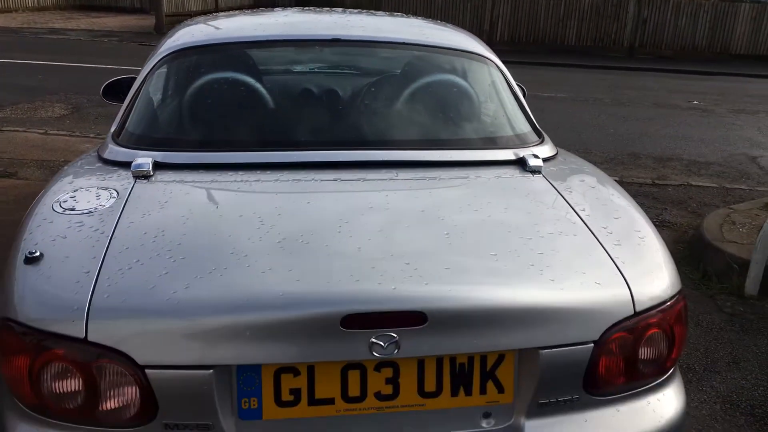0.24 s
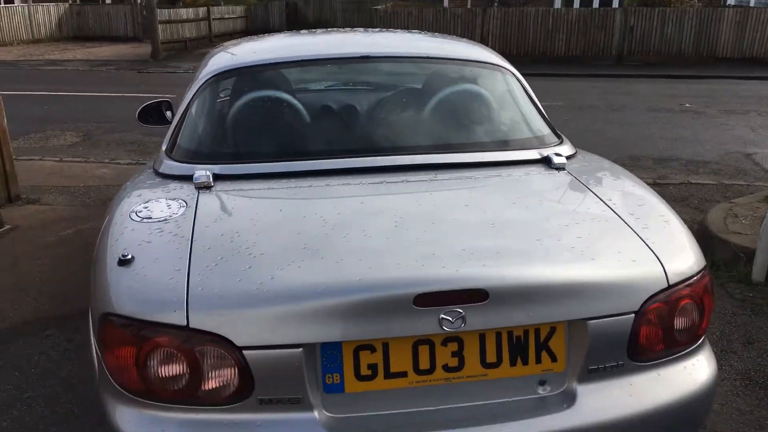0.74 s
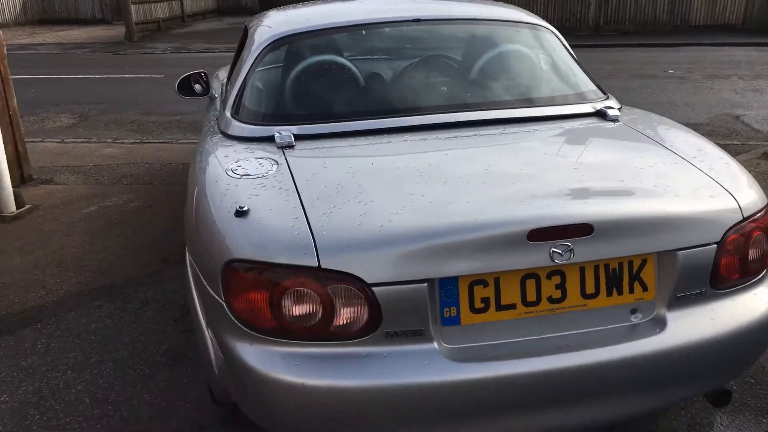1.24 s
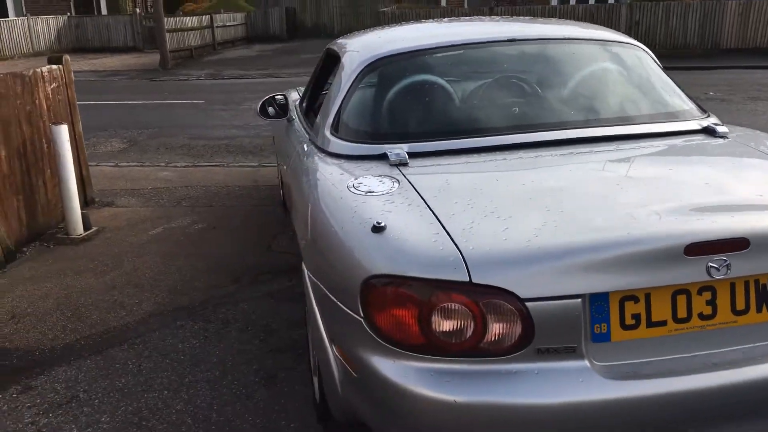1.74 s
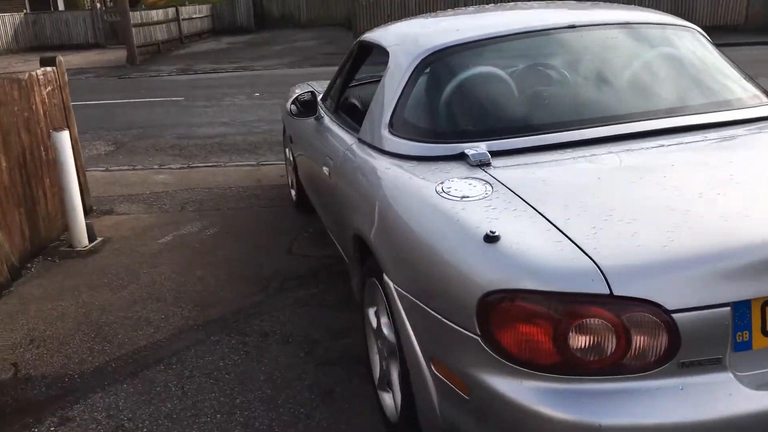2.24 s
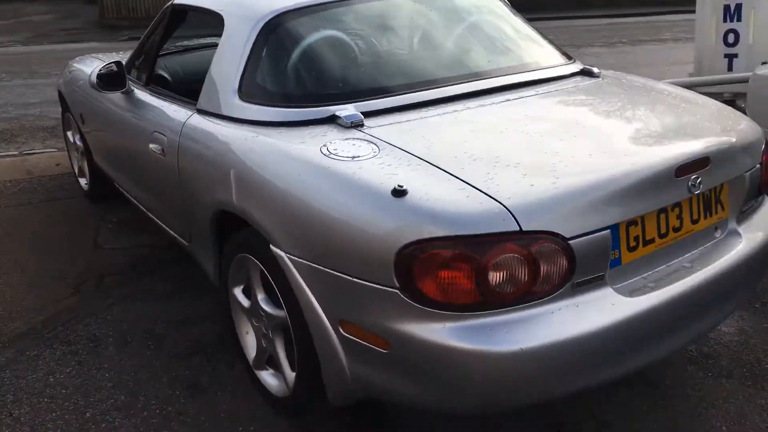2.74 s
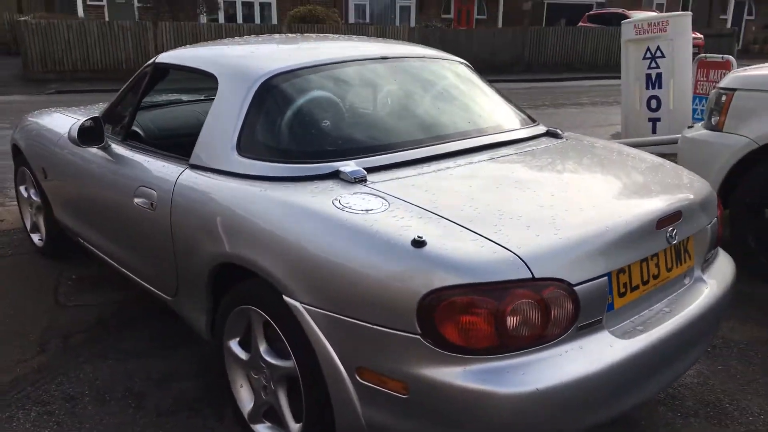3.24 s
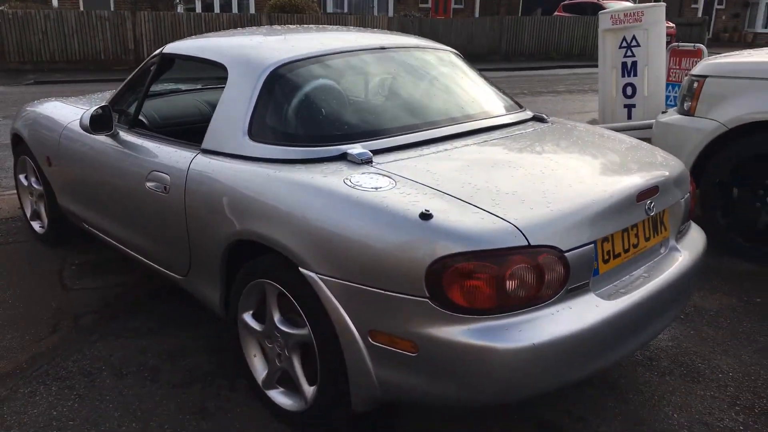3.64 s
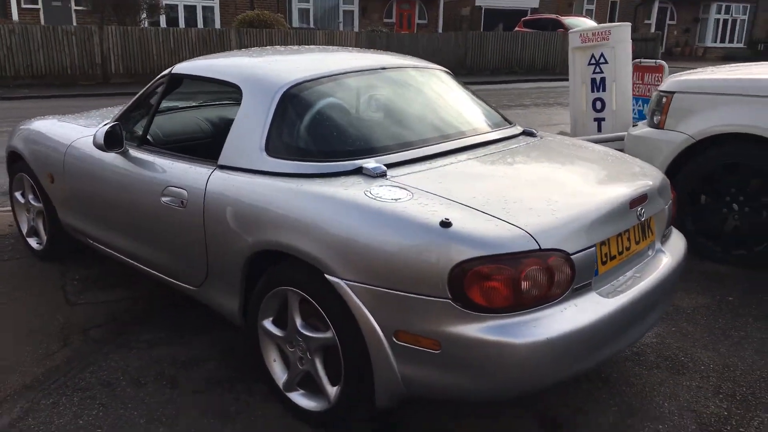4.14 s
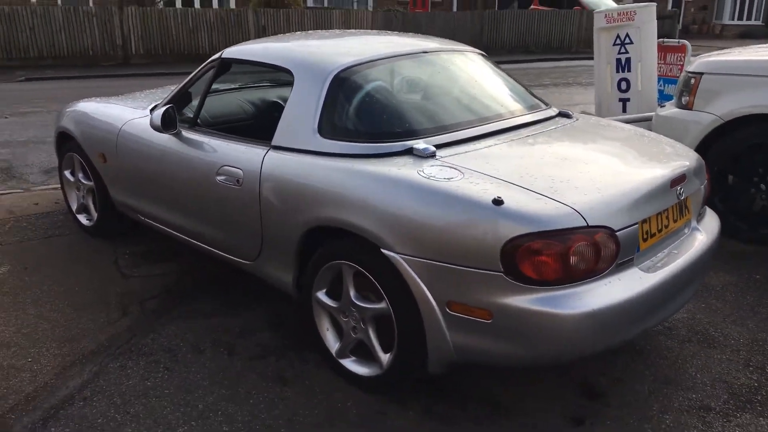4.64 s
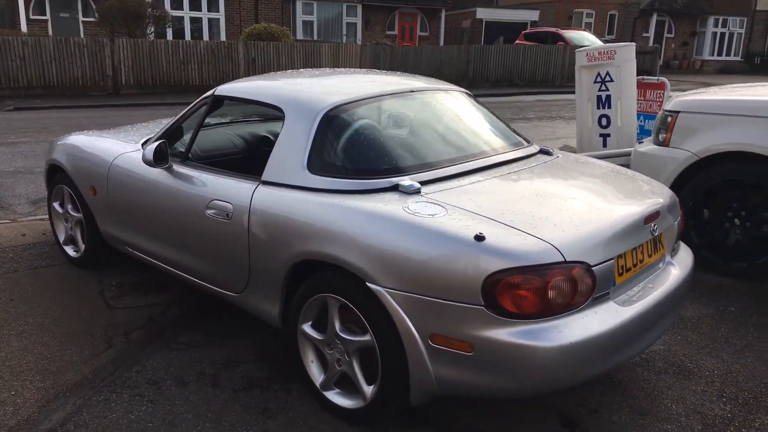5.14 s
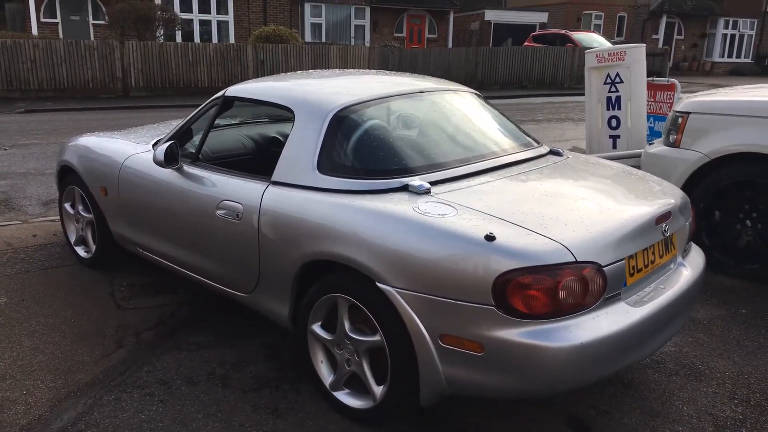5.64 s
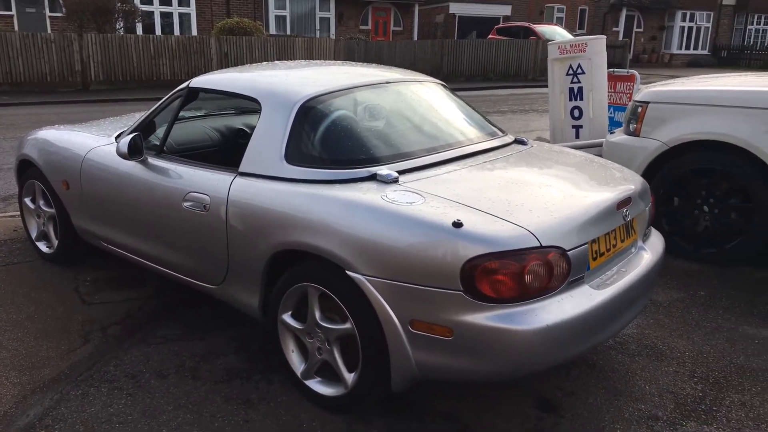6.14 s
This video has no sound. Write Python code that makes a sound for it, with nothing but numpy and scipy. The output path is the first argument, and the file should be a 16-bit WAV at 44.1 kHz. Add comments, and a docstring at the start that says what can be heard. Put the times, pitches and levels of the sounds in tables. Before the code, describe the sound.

Low, ragged wind buffeting thumps a small outdoor microphone over faint traffic roar, with tiny grit ticks and a rattle, then a sudden loud jump.

```python
"""A forecourt beside a road: someone walks round a parked car, holding a small microphone in a breeze.
Gusts buffet it with low rumble, flutter and pulse-like slaps; shaped noise makes the far traffic's roar.
Grit and a loose rattle are filtered random clicks, keys are decaying sines, small birds gliding whistles.
Near the end the level of the whole scene jumps up abruptly at a volume step, written into the level
curves and a swap of background noise, and one hard gust overloads the input."""
import sys
import numpy as np
from scipy import signal
from scipy.fft import rfft, irfft, next_fast_len
from scipy.io import wavfile
from scipy.ndimage import uniform_filter1d

SR = 44100
rng = np.random.default_rng(int(sys.argv[2]) if len(sys.argv) > 2 else 0)


def int16_out(signal):
    """Quantize to a 16-bit WAV file."""
    q = np.round(np.clip(np.atleast_2d(signal).T, -1, 1) * 32767)
    wavfile.write(sys.argv[1], SR, q.astype(np.int16))


def gain_from_db(level_db):
    """Turn a decibel level (scalar or array-like) into a linear amplitude factor."""
    decades = np.asarray(level_db, float) / 20
    return 10 ** decades


N = 281358  # length in samples


def rms_one(x):
    """Scale to rms 1."""
    return x / np.sqrt(np.mean(x ** 2) + 1e-20)


def in_time(rows):
    """Curves with one value per sample, one for each column after the time."""
    s, *columns = np.transpose(rows)
    return [np.interp(np.arange(N) / SR, s, column) for column in columns]


def drift(rate_hz):
    """Slow random wander of rms 1: noise through two equal poles, made at every 40th sample."""
    pole = np.exp(-2 * np.pi * rate_hz * 40 / SR)
    noise = rng.standard_normal(N // 40 + 2002)
    slow = signal.lfilter([1], [1, -2 * pole, pole * pole], noise)[2000:]  # drop the settling
    return np.interp(np.arange(N) / 40, np.arange(len(slow)), rms_one(slow))


def coloured(spectrum):
    """Noise of rms 1 shaped to a spectrum, falling 30 dB per octave beyond its ends."""
    hz, db = np.transpose(spectrum)
    size = next_fast_len(N)
    bins = np.maximum(np.fft.rfftfreq(size, 1 / SR), 1)
    skirt_db = -30 * np.log2(np.maximum(hz[0] / bins, 1) * np.maximum(bins / hz[-1], 1))
    shape = gain_from_db(np.interp(np.log(bins), np.log(hz), db) + skirt_db)
    return rms_one(irfft(rfft(rng.standard_normal(size)) * shape, size)[:N])


def band_rms(x, low_hz, high_hz):
    """Rms of one band."""
    sos = signal.butter(4, [low_hz, high_hz], "band", fs=SR, output="sos")
    return np.std(signal.sosfilt(sos, x))


def add(out, s, piece):
    """Mix a short sound in at s seconds."""
    at = round(s * SR)
    out[at:at + len(piece)] += piece[:N - at]


def steady(x, over_s):
    """Even out the slow swells of narrow noise."""
    return x / np.sqrt(uniform_filter1d(x ** 2, size=round(over_s * SR)) + 0.14)


def peak(x, hz, width_hz):
    """A resonance of gain 1 on top."""
    return signal.lfilter(*signal.iirpeak(hz, hz / width_hz, SR), x)


def background():
    """Far tyre roar over microphone noise; at a volume step it jumps up in level and changes colour."""
    # before the step: start_s, roar_db (830-2500 Hz band), hiss_db (microphone hiss near 5.4 kHz)
    traffic = [(0, -60, -82.5), (.9, -62, -83.5), (1.6, -63.5, -88.5), (2.4, -65.5, -90.5),
               (4.3, -66, -90.5), (5.5, -63.5, -99)]
    # colour of roar and self-noise before the step: frequency_hz, density_db (per Hz)
    quiet_spectrum = [(200, -7), (350, -5), (490, -10), (900, -1), (1750, 0), (2200, -8), (2850, -19.5),
                      (4000, -27.5), (7000, -31), (9600, -31.5), (11000, -35), (13900, -36), (14800, -52)]
    # colour of the background after the step: frequency_hz, density_db (per Hz)
    loud_spectrum = [(200, -4), (330, -3), (500, -9), (720, -4), (1060, 0), (1610, -3), (2250, -12),
                     (3100, -20), (4600, -24.5), (5100, -30), (6100, -33.5), (7600, -41), (10000, -47),
                     (15600, -49)]
    step_s, step_rise_s, loud_db = 5.533, 0.0062, -46

    roar_db, hiss_db = in_time(traffic)
    quiet, loud = coloured(quiet_spectrum), coloured(loud_spectrum)
    quiet = quiet / band_rms(quiet, 830, 2500)
    # the microphone's faint self-noise keeps its level while the roar changes
    roar = signal.filtfilt(*signal.butter(2, 5100, fs=SR), quiet)
    self_noise = gain_from_db(roar_db.mean()) * (quiet - roar)
    swell_db = 0.76 * drift(14) + 0.4 * drift(4.1)
    microphone_hiss = gain_from_db(hiss_db) * coloured([(5000, -6.0), (5420, -2.0), (6300, -13.0)])
    quiet = self_noise + gain_from_db(roar_db + swell_db) * roar + microphone_hiss

    loud = gain_from_db(loud_db + 1.0 * drift(13.4)) * loud / band_rms(loud, 1050, 2500)
    up = np.clip((np.arange(N) / SR - step_s) / step_rise_s, 0, 1)
    return quiet * (1 - up) + loud * up


def birds():
    """Gliding whistles; breathy ones are smeared by a fast random flutter of their strength."""
    # bird notes: start_s, length_s, two or more pitch_hz passed at even steps (or one held),
    # level_db, breathiness (0-1)
    notes = [(4.508, .037, 4550, 4400, -86, .6), (5.785, .047, 6200, 5950, 5950, -69.5, .65),
             (5.893, .024, 4590, 4620, -68, .2), (5.955, .06, 7400, 7200, 6750, -76, .15),
             (6.113, .064, 8050, 7650, 7250, 7150, 6700, -70.5, .25),
             (6.116, .04, 5550, 6250, 6050, -71, .55), (6.14, .03, 4230, 4640, 4670, -62, .4),
             (6.154, .032, 4250, 3950, -58.5, .8), (6.17, .075, 3200, -59.5, .85)]
    out, flutter = np.zeros(N), drift(260)
    for start, length, *glide_hz, db, breath in notes:
        u = np.linspace(0, 1, round(length * SR))
        pitch_hz = np.interp(u * (len(glide_hz) - 1), np.arange(len(glide_hz)), glide_hz)
        strength = np.sqrt(1 - breath ** 2) + breath * flutter[round(start * SR):][:len(u)]
        envelope = np.sqrt(2 * np.sin(np.pi * u))
        whistle = np.sin(2 * np.pi * np.cumsum(pitch_hz) / SR)
        add(out, start, gain_from_db(db) * strength * envelope * whistle)
    return out


def keys():
    """Keys touching in a pocket: thin metal modes, struck softly."""
    # touches: start_s, then level_db of each mode in turn
    touches = [(2.042, -71.5, -73, -87), (2.164, -74.5, -105, -88.5), (2.313, -96, -73, -73),
               (2.855, -74, -86, -68)]
    # modes of the metal: pitch_hz, t60_s (time to fall 60 dB)
    modes = [(5960, .08), (8310, .08), (15010, .075)]
    out, t = np.zeros(N), np.arange(round(.15 * SR)) / SR
    soft_start = 1 - np.exp(-t / .002)
    for s, *levels_db in touches:
        for (hz, t60), db in zip(modes, levels_db):
            add(out, s, gain_from_db(db - 60 * t / t60) * soft_start * np.sin(2 * np.pi * hz * t))
    return out


def rattles():
    """A small loose object: each shake is a dense run of touches dying away, ringing in the same modes."""
    # shakes: start_s, peak_db, dying_s (time constant)
    shakes = [(3.974, -61, 0.0086), (3.989, -49, 0.013), (4.012, -54, 0.003), (4.085, -69, 0.022),
              (4.646, -52.5, .004)]
    # modes of the object: pitch_hz, width_hz, level_db
    modes = [(1710, 420, 8.5), (3700, 1400, -8), (5240, 440, 1.5), (6370, 400, -6), (8450, 400, -6)]
    out, t = np.zeros(N), np.arange(4096) / SR
    chance = rng.standard_normal((len(shakes), 2, 4096))
    for (s, db, dying), (size, when) in zip(shakes, chance):
        touches = size * (when > 1.2) * np.exp(-t / dying) * (1 - np.exp(-t / .001))
        shake = gain_from_db(-18) * touches  # broad part of each touch
        for hz, width, mode_db in modes:
            shake = shake + gain_from_db(mode_db) * peak(peak(touches, hz, width), hz, 2 * width)
        add(out, s, gain_from_db(db) * shake / np.max(np.abs(shake)))
    return out


def crackles():
    """Finer grit as the feet shuffle: rows like those of the grit, at chance moments and pitches."""
    from_s, to_s, per_s, peak_db, spread_db = 2.5, 3.4, 11, -65, 6
    when, size, pitch = rng.random((60, 3)).T
    s = from_s + np.cumsum(-np.log(1 - when)) / per_s
    db = peak_db + spread_db * (2 * size - 1)
    centre_hz = 1800 * 6.5 ** pitch
    rows = np.transpose([s, db, centre_hz, np.full(len(s), .0015)])
    return list(rows[s < to_s])


def grit():
    """A few grains crack at once: sparse clicks dying away, broad in colour with two short rings."""
    # grit under a shoe: start_s, peak_db, centre_hz, dying_s (time constant)
    crunches = [(1.988, -53.5, 5470, 0.0011), (2.648, -63, 13000, 0.0018), (2.71, -46, 1390, 0.001),
                (2.726, -64.5, 4500, .008), (2.742, -53, 1900, 0.00056), (2.937, -58.5, 10100, 0.0033),
                (3.009, -62.5, 9500, .004), (3.289, -64, 8500, 0.0065), (3.365, -60.5, 2620, 0.0085),
                (4.485, -60, 10500, 0.006), (4.612, -61, 5960, 0.036)]
    # resonances that every crack excites: pitch_hz, width_hz, level_db
    grit_rings = [(5340, 300, 2), (8650, 230, 4)]
    out, chance = np.zeros(N), rng.standard_normal((80, 2, 2048))
    t = np.arange(2048) / SR
    for (s, db, hz, dying), (size, when) in zip(crunches + crackles(), chance):
        cracks = size * ((when > 1.6) | (t == 0)) * np.exp(-t / max(dying, .0003))
        sos = signal.butter(2, [hz / 1.6, min(hz * 1.6, .45 * SR)], "band", fs=SR, output="sos")
        tick = signal.sosfilt(sos, cracks)
        tick = tick + sum(gain_from_db(ring_db) * peak(tick, ring_hz, width) for ring_hz, width, ring_db in grit_rings)
        add(out, s, gain_from_db(db) * tick / np.max(np.abs(tick)))
    return out


def wind_db():
    """Rumble level: every gust climbs and dies evenly in dB over the breeze; flutter rides on it."""
    # steady breeze between the gusts: start_s, rumble_db
    breeze = [(0, -60), (.45, -57.5), (.7, -60.5), (1.08, -58.5), (1.5, -49.5), (1.9, -64), (2.33, -67),
              (2.42, -51), (3.3, -51), (3.55, -59), (3.9, -63.5), (4.1, -55.5), (4.3, -67.5), (5.0, -66),
              (5.27, -67.5), (5.31, -52), (5.52, -54.5), (5.7, -43.5), (6.38, -43)]
    # gusts that buffet the microphone: peak_s, peak_db, fall_s (to die by 20 dB; under 0.01 acts as 0.01)
    gusts = [(1.109, -50.5, -0.1), (1.23, -28.5, 0.18), (1.342, -36, 0.16), (1.581, -39.5, 0.05),
             (1.804, -40.5, 0.05), (1.961, -49.5, 0.2), (2.082, -37.5, 0.17), (2.21, -34.5, 0.03),
             (2.379, -42.5, 0.06), (2.48, -44, 0.3), (2.6, -43, 0.25), (2.649, -43, 0.36), (2.8, -48, 1),
             (2.967, -29.5, 0.08), (3.177, -45, 0.33), (3.288, -41.5, 0.05), (3.476, -46, -0.03),
             (3.617, -51, 0.05), (3.696, -36, 0.0851), (3.836, -53, 0.2), (4.145, -50, 0.15),
             (5.158, -57, 0.07), (5.471, -42, 0.3), (5.567, -35, 0.16), (5.636, -19.5, 0.0148),
             (5.676, -23, 0.02), (5.766, -25.5, 0.04), (5.83, -35, 0.06), (5.946, -37, -0.1),
             (6.046, -39.5, 0.5), (6.376, -35.5, 0.151)]
    # how ragged the wind is: start_s, flutter_db (relative to the rumble)
    ragged = [(0, -8), (1.1, -12), (2.4, -7), (4.3, -15), (5.65, -13), (5.75, -22.5), (6.38, -22)]
    gust_rise_s = 0.053  # every gust climbs its last 20 dB in this time
    t, power = np.arange(N) / SR, gain_from_db(in_time(breeze)[0]) ** 2
    for s, db, dying_s in gusts:
        lengths = np.where(t > s, (t - s) / max(dying_s, .01), (s - t) / gust_rise_s)
        power = power + gain_from_db(db - 20 * lengths) ** 2
    rumble_db = uniform_filter1d(10 * np.log10(power), size=round(.008 * SR))
    return rumble_db, rumble_db + in_time(ragged)[0]


def small_slaps():
    """Lesser slaps at chance moments, following the flutter: rows of start_s, peak_db, strongest_hz."""
    per_s, over_flutter_db, spread_db, low_hz, high_hz = 18, 15.5, 3, 97.1, 210.2
    when, size, pitch = rng.random((120, 3)).T
    s = np.cumsum(-np.log(1 - when)) / per_s + .05
    flutter_db = np.interp(s * SR, np.arange(N), wind_db()[1])
    db = flutter_db + over_flutter_db + spread_db * (2 * size - 1)
    rows = np.transpose([s, db, low_hz * (high_hz / low_hz) ** pitch])
    return list(rows[s < N / SR])


def push_pull(t, hz, turn):
    """A sharp-cornered pulse, strongest at hz, its spectrum falling about evenly in dB per Hz above."""
    sharp = 3.15
    return np.exp(2j * np.pi * turn) / (1 - 2j * np.pi * hz * t / (sharp - 1)) ** sharp


def slaps():
    """Each eddy at the port is a sharp push and pull; a ragged wake of three lesser, lower ones follows."""
    # hardest eddies that slap the microphone port: start_s (of the main pulse's centre),
    # peak_db (of that pulse's envelope), strongest_hz
    hard_slaps = [(1.11, -40.5, 130), (1.214, -21.5, 134), (1.231, -27, 212), (1.2688, -29, 70.4),
                  (1.3332, -33, 307), (1.3466, -33, 163), (1.3723, -23.5, 230), (1.4139, -25, 151),
                  (1.5805, -29.5, 195), (1.6655, -29, 84), (1.7174, -35.5, 220), (2.0682, -24, 74.4),
                  (2.086, -30, 223), (2.104, -28, 129), (2.1414, -29.5, 241), (2.1494, -28.5, 386),
                  (2.1593, -26.5, 118), (2.19, -29.5, 208), (2.235, -32, 162), (2.262, -36, 133),
                  (2.428, -34.5, 140), (2.5565, -35.5, 292), (2.601, -37, 253), (2.6249, -25, 171),
                  (2.645, -29.5, 89), (2.7372, -26.5, 155), (2.7944, -27, 145), (2.847, -31, 110),
                  (2.933, -35, 240), (2.962, -31.5, 148), (2.982, -26.5, 152), (3.006, -35, 260),
                  (3.018, -36, 198), (3.032, -35, 270), (3.1313, -29, 156), (3.1734, -32, 262),
                  (3.2147, -37.5, 169), (3.2848, -31.5, 182), (3.3465, -27.5, 332), (3.3643, -32.5, 410),
                  (3.415, -40, 190), (3.47, -36.5, 111), (3.617, -40.5, 150), (3.683, -37, 437),
                  (3.691, -30, 129), (3.702, -39.5, 302), (3.737, -44, 170), (3.828, -41, 148),
                  (4.135, -42, 165), (5.302, -39.5, 135), (5.36, -41.5, 206), (5.467, -42.5, 220),
                  (5.5674, -20.5, 108), (5.62, -21, 196), (5.6267, -11, 294), (5.631, -10, 90.2),
                  (5.6374, -9.5, 333), (5.6412, -12, 392), (5.764, -32, 80.4)]
    rows = hard_slaps + small_slaps()
    out, chance = np.zeros(N), rng.random((200, 4, 3))
    t = np.arange(-1323, 1764) / SR  # 30 ms before to 40 ms after
    fade = signal.windows.tukey(len(t), .5)
    for (s, db, hz), ((phase, _, _), *wake) in zip(rows, chance):
        pulse, late_s = push_pull(t, hz, phase), 0
        for k, (turn, lag, pitch) in enumerate(wake):
            late_s += (0.695 + 0.886 * lag) / hz
            wake_hz = (0.37 + 0.45 * pitch) * hz
            pulse = pulse + gain_from_db(-3.5 - 4.7 * k) * push_pull(t - late_s, wake_hz, turn)
        add(out, s + t[0], gain_from_db(db) * fade * pulse.real)
    return out


def wind():
    """Turbulence at the port: a low rumble and a lumpier flutter on the same eddies."""
    # colour of the rumble: frequency_hz, density_db (per Hz)
    rumble_spectrum = [(33, -25), (45, -0.5), (70, 1.5), (100, -6), (140, -14), (200, -25.5)]
    # colour of the flutter: frequency_hz, density_db (per Hz)
    flutter_spectrum = [(100, -9), (160, 3), (260, -3.5), (450, -17.5), (900, -32)]
    rumble_db, flutter_db = wind_db()
    eddies = drift(36)
    rumble = gain_from_db(rumble_db + 2.74 * eddies) * steady(coloured(rumble_spectrum), 0.021)
    lumps_db = 2.5 * eddies + 3 * drift(60)
    flutter = gain_from_db(flutter_db + lumps_db) * coloured(flutter_spectrum)
    return rumble + flutter


def scene():
    """Wind at the port over the forecourt and the far traffic, as one channel."""
    far = background() + birds()
    close_by = keys() + rattles() + grit()
    return (far + close_by + slaps() + wind())[None]


def roll_off(x):
    """The treble ends steeply here."""
    return signal.sosfilt(signal.butter(12, 15740, fs=SR, output="sos"), x)


def record(dry):
    """The microphone cuts the deepest bass and dips at two pitches; its input flattens the hardest gust."""
    # dips of the microphone port: centre_hz, width_hz, share taken out (0-1)
    port_notches = [(4930, 230, 0.28), (10330, 620, 0.46)]
    overload = .345  # ceiling of the input, in full scale
    dry = signal.sosfilt(signal.butter(2, 38.2, "high", fs=SR, output="sos"), dry)
    x = dry - sum(share * peak(dry, hz, width) for hz, width, share in port_notches)
    x = x / (1 + np.abs(x / overload) ** 6) ** (1 / 6)
    return roll_off(x)


dry = scene()
out = record(dry)
int16_out(out)
```